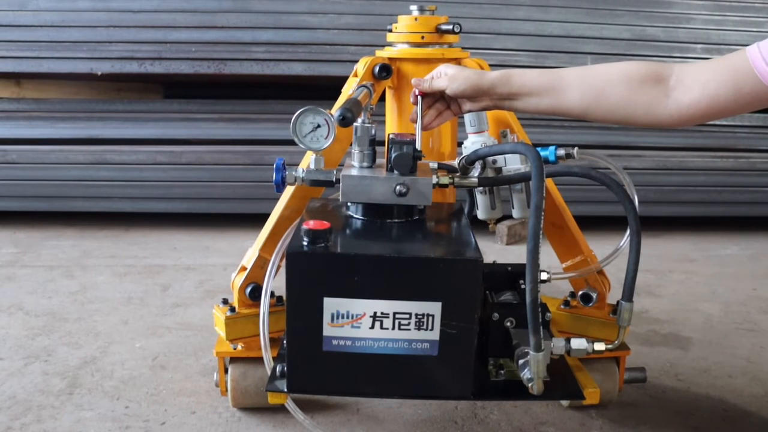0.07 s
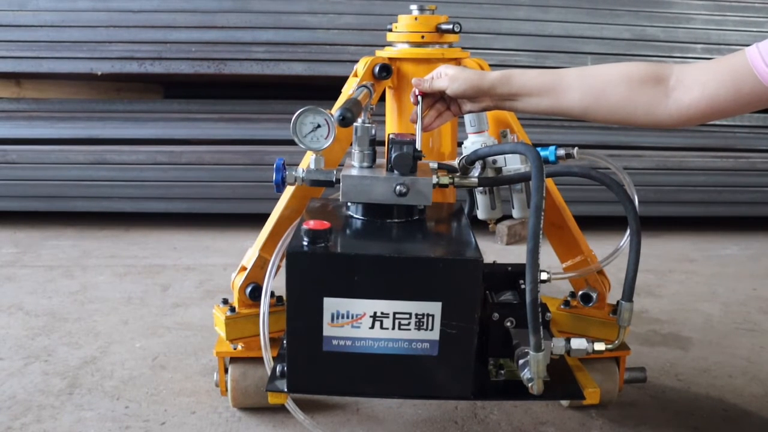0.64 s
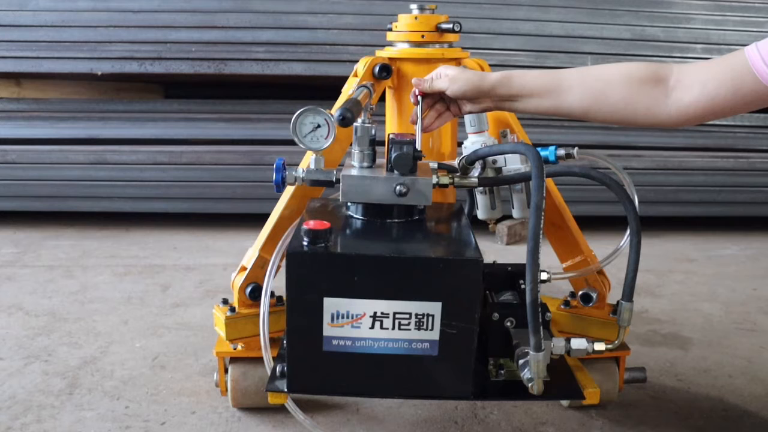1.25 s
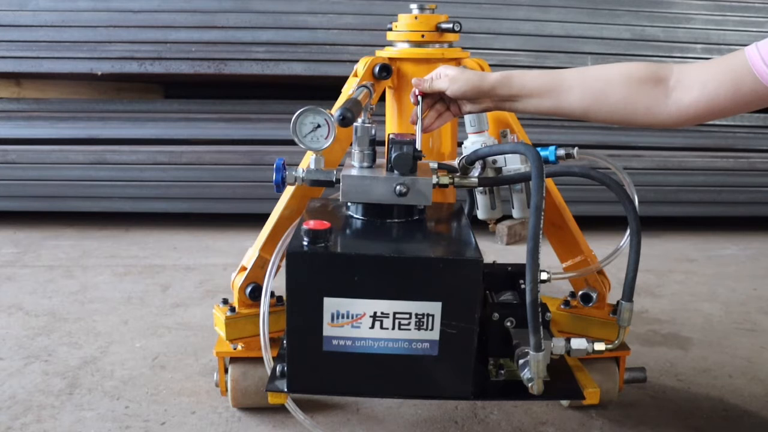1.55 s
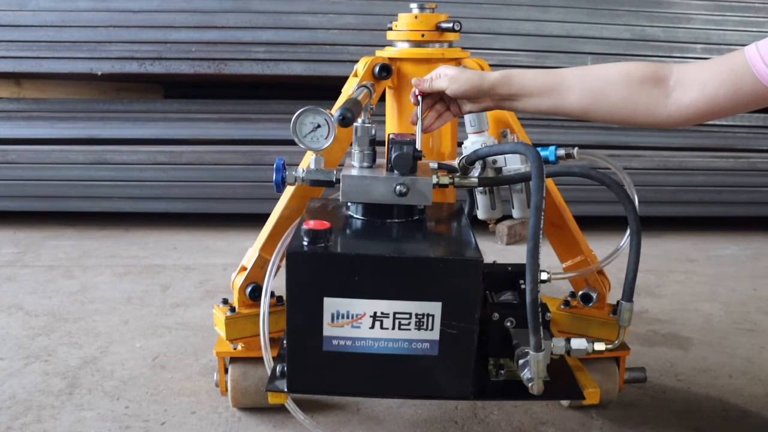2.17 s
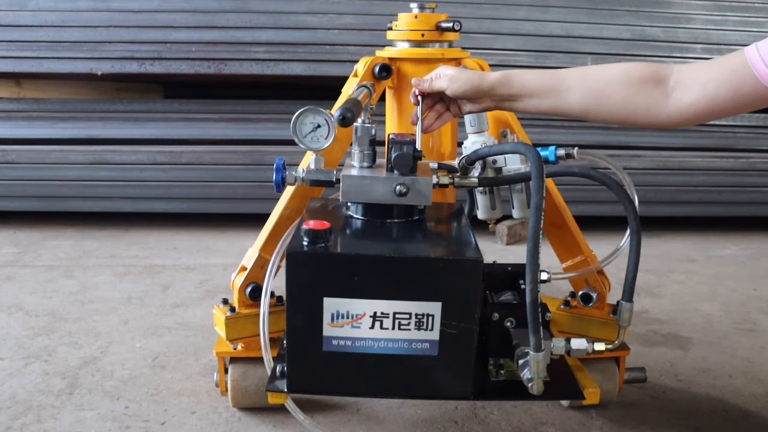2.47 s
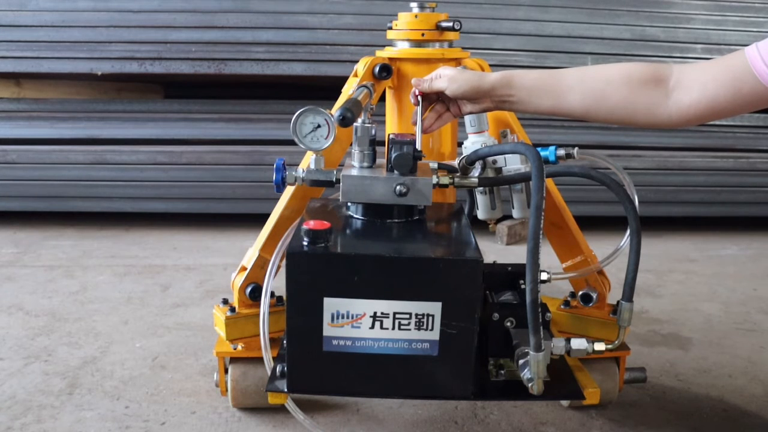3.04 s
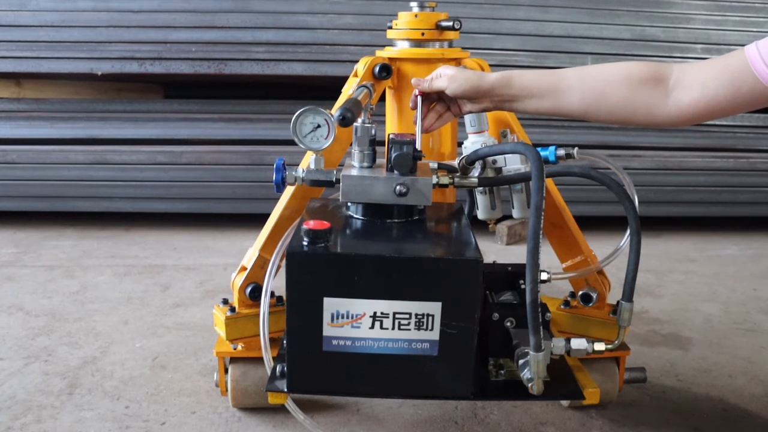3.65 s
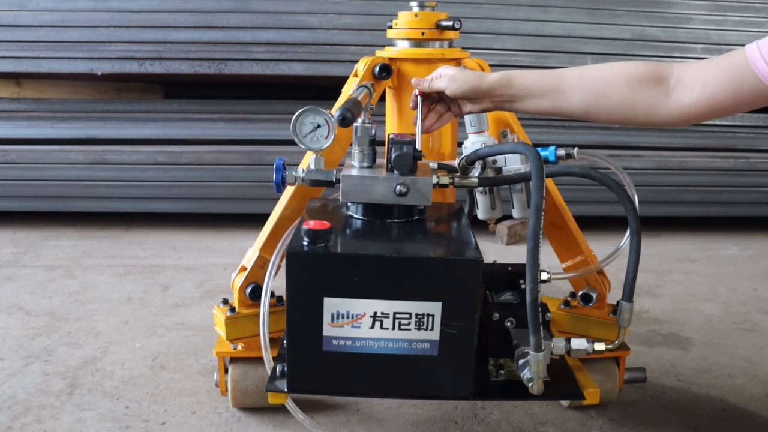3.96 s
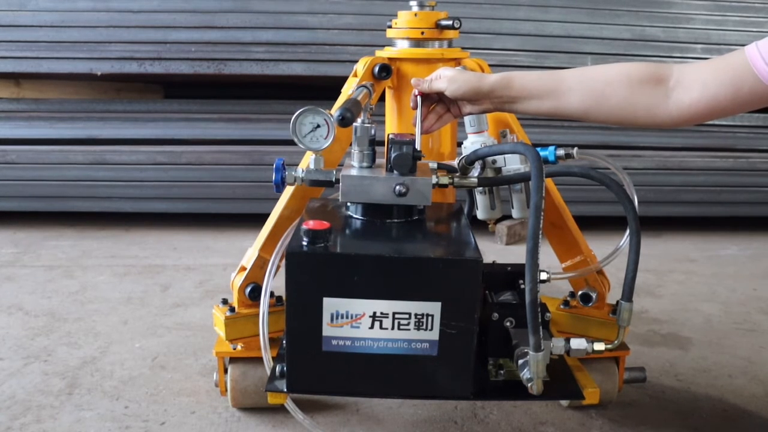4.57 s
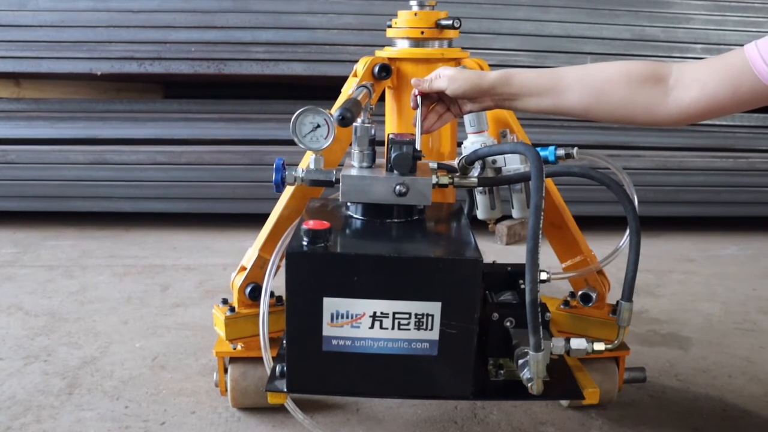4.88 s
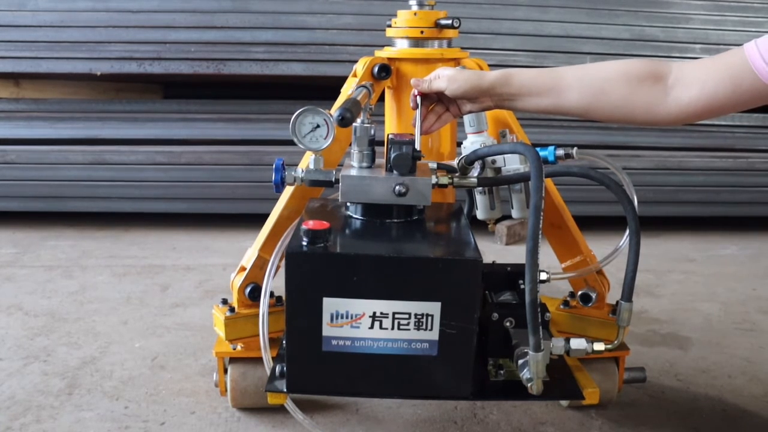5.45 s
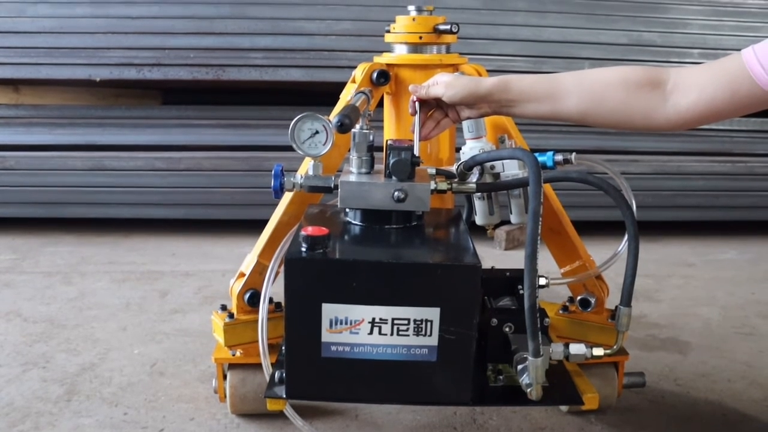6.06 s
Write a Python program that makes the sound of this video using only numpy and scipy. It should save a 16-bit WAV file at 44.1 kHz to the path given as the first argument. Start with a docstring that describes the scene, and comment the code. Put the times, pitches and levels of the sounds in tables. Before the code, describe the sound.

An air-driven hydraulic pump on a jack runs throughout at nearly eight strokes a second. Each stroke gives a bright spit of air, a metallic valve click and a knock on the oil tank, then a duller return knock. Exhaust air hisses continuously over a low rush. The pump is close by in a lightly echoing workshop, and its draught buffets the microphone in irregular gusts.

```python
"""Air-driven jack pump

An air-driven hydraulic pump runs on a jack in a workshop, nearly eight strokes a second. Each cycle
the air valve spits and clicks, and the piston knocks on the oil tank, then again, duller, on its return.
Spent air hisses through the muffler all the while over a low rush; its draught buffets the microphone."""
import sys
import numpy as np
from scipy import signal
from scipy.fft import rfft, irfft
from scipy.io import wavfile
from scipy.ndimage import uniform_filter1d

SR = 44100
rng = np.random.default_rng(int(sys.argv[2]) if len(sys.argv) > 2 else 0)


def generate_wav(sig):
    """Save sig (samples, or channels by samples) to the path in sys.argv[1] as 16-bit PCM at SR."""
    pcm = np.round(np.clip(np.atleast_2d(sig).T, -1, 1) * 32767).astype(np.int16)
    wavfile.write(sys.argv[1], SR, pcm)


N = 278271
TIME, HZ = np.arange(N) / SR, np.fft.rfftfreq(N, 1 / SR)

# pump strokes: t/s, knock accent/dB, spit accent/dB
STROKES = [(0.0082, -0.5, 0.5), (0.1366, 0, -0.5), (0.2656, -1.5, -3), (0.3942, -0.5, 0.5),
           (0.5234, -1, -2), (0.6522, 1, 1), (0.781, 0, -1), (0.9103, -2, 0.6), (1.0397, -1, 0),
           (1.1681, 0.5, 1), (1.2971, -1, -0.5), (1.426, -1, -1.5), (1.555, -1.2, -0.5), (1.6838, -3.5, -3),
           (1.8133, 0.5, -0.3), (1.9427, 0.5, -0.5), (2.0716, -0.5, -1.3), (2.201, 1, 0.7), (2.3303, 1, 0),
           (2.4589, 1, 0.5), (2.5873, -1.5, 1), (2.7164, -1.5, -0.5), (2.846, 1.5, -0.5),
           (2.975, -0.5, 0.5), (3.1037, -2.5, 0), (3.232, 0.5, 0.5), (3.3608, -0.7, 1.5), (3.4895, 1.5, 1),
           (3.6185, 2.5, 1), (3.748, 3, 0), (3.877, -2, -1), (4.0062, -5, -15), (4.1352, 0, 1),
           (4.2637, -0.5, 0.2), (4.3934, -5, -1), (4.5225, -0.8, 0.2), (4.6517, 0.5, 0), (4.782, 0.5, 1),
           (4.9103, -0.5, -1), (5.0394, 2, 0), (5.1686, 0.4, 0.5), (5.2974, -1.5, -0.5), (5.427, -0.6, 0),
           (5.5549, 3, 0.5), (5.6843, 0.5, 0.5), (5.8136, 1, -0.5), (5.9428, 2, 1), (6.0483, -1, -1.5),
           (6.1774, 0.6, 0.5), (6.3065, 0.5, 0)]
# likeness of the air noise at the two microphone ports: f/Hz, coherence/0-1
AIR_COHERENCE = [(150, .5), (1000, .8), (2100, .8), (2700, .4), (4400, .88), (5200, .55), (10000, .68),
                 (12000, .4)]
# air noise arrives mostly from the right: f/Hz, left phase lead/rad
AIR_PHASE = [(1200, -0.37), (3100, -0.02), (4300, 0.26), (6100, -0.6), (8700, -0.99), (9300, -1.1),
             (11700, -2)]
# balance of the air noise: f/Hz, left minus right/dB
AIR_PAN = [(150, -2), (1000, 0), (2100, -1), (3200, -3.5), (4400, 0), (6300, -3), (8300, -3), (10000, -4),
           (12000, -5.5)]
# colour of the air valve's spit: f/Hz, level/dB
SPIT_SPECTRUM = [(500, -18), (2200, -5), (2720, 2), (3300, -4), (4500, 9.5), (5100, -16), (7500, 5.5),
                 (8800, 1.5), (10200, 7), (12000, 5)]
# exhaust envelope through one cycle: t/s after the stroke, level/dB
EXHAUST_ENVELOPE = [(0, 3), (.003, 6), (.013, 5.5), (.05, 4), (.0572, 2), (.0592, -2.5), (.0617, -1),
                    (.0645, 2.5), (.095, 3), (.118, 5.5), (.129, 2)]
# colour of the hiss through the muffler: f/Hz, level/dB
MUFFLER_SPECTRUM = [(1000, -43), (1700, -4), (1980, -3.5), (2400, 0), (2720, -6), (3230, 1.5), (3650, 0),
                    (3880, -2.5), (4100, 0), (4450, 1.5), (4900, -4.5), (5400, -3), (5950, -3.5), (6400, 1),
                    (6900, -0.5), (7450, 3), (8000, 0), (8550, -3.5), (9200, -3.5), (9950, 2), (10900, -3),
                    (11400, -4.5), (11750, -7), (15500, -43), (22000, -120)]
# colour of the low rush of air and oil: f/Hz, level/dB
RUSH_SPECTRUM = [(30, -11), (58, -25), (95, -8), (160, 4), (290, 5), (400, -2.5), (490, -0.5), (700, 1),
                 (1100, 4), (1450, -0.5), (1600, -0.5), (2100, -11), (2700, -38)]
# piston blows in three groups, the knock, a springy mid-stroke tap and the duller return:
# t/s after the stroke, relative force (push +, pull -), contact corner f/Hz, contact damping
PISTON_BLOWS = [(-0.00182, 0.087, 919, 0.19), (-0.00041, 0.87, 2428, 1.4), (0.00116, 0.2, 1370, 0.25),
                (0.00183, -0.55, 1096, 1.8), (0.00427, 0.19, 722, 0.81), (0.03284, 0.023, 1272, 0.16),
                (0.0367, 0.11, 1270, 0.15), (0.0536, 0.052, 741, 0.25), (0.05767, 0.47, 706, 0.69),
                (0.0589, 0.65, 683, 0.71), (0.06144, -0.23, 784, 0.26), (0.06408, 0.24, 1830, 0.97),
                (0.0731, 0.03, 1084, 0.12)]
# ring of the pump body and oil tank: f/Hz, level/dB, t60/s
TANK_MODES = [(160.5, -22, 0.093), (210, -12.5, 0.016), (484, -21, 0.04), (602, -23, 0.06),
              (710, -14, 0.042), (902, -11.5, 0.021), (1005, -6.5, 0.035), (1061, -4.5, 0.025),
              (1125, -10, 0.045), (1419, -9, 0.053), (1697, -12, 0.024), (1906, -5.5, 0.014),
              (2053, -5, 0.03)]
# valve clicks in one cycle: t/s after the stroke, relative force
VALVE_CLICKS = [(-.0095, .25), (.003, 0.42), (.0075, .28), (0.0525, 0.089)]
# ring of the steel valve: f/Hz, level/dB, t60/s
VALVE_MODES = [(3180, 6, 0.035), (3320, 6, 0.026), (3800, -2, 0.011), (4100, -4, .03), (4280, 0, 0.035)]
# workshop reverb: f/Hz, t60/s
ROOM_DECAY = [(150, 0.94), (1000, 0.041), (4000, 1), (12000, 0.68)]
# narrow hollows in the pump's tone: f/Hz, width/Hz, gain/dB
NOTCHES = [(428, 45, 0), (1620, 84, -2.5), (2684, 72, -4.5), (5050, 210, -2), (8800, 320, -.8)]
# gusts of exhaust air at the microphone: t/s, level/dB, length/s, centre f/Hz, left minus right/dB
GUSTS = [(0.105, -27, 0.13, 503, -4), (0.248, -22.5, 0.024, 440, -7), (0.309, -21, 0.026, 588, -12),
         (0.411, -18.5, 0.042, 490, -15), (0.441, -18.1, 0.018, 427, -9), (0.571, -20.5, 0.017, 520, -6),
         (0.671, -18.5, 0.053, 440, -7), (0.967, -22, 0.017, 510, 8), (0.998, -25, 0.042, 390, 4),
         (1.07, -21, 0.013, 380, 7), (1.145, -23, 0.06, 365, 5), (1.341, -26.4, 0.057, 580, 6),
         (1.547, -22.5, 0.017, 445, -9), (1.782, -23.5, 0.013, 380, -10), (2.151, -20.5, 0.016, 346, -11),
         (2.219, -29, 0.031, 312, -10), (2.251, -16, 0.044, 266, -10.5), (2.32, -24, 0.15, 212, -3),
         (2.527, -23, 0.037, 510, -6), (2.855, -25.5, 0.059, 503, -10), (2.898, -16, 0.017, 435, -8),
         (3.107, -25, 0.023, 543, -7), (3.157, -26, 0.038, 533, -9), (3.282, -17, 0.044, 534, -9),
         (3.538, -22.5, 0.021, 450, -8), (3.573, -19, 0.0091, 355, 0), (3.607, -16, 0.011, 550, -8),
         (3.64, -15.5, 0.034, 380, -9), (3.682, -16.5, 0.034, 473, -8), (3.893, -17.5, 0.025, 611, -8),
         (3.939, -24, 0.037, 557, 0), (3.974, -16, 0.047, 560, -5), (4.322, -21, 0.0068, 730, -2),
         (4.345, -15, 0.015, 546, -6), (4.384, -23.5, 0.019, 623, -7), (4.928, -27, 0.014, 376, -6),
         (4.969, -23, 0.051, 334, -6), (5.01, -18, 0.037, 430, -16), (5.07, -21.5, 0.2, 230, -6),
         (5.108, -17.5, 0.026, 445, -16), (5.25, -19.5, 0.055, 604, -8), (5.836, -24.5, 0.12, 274, -11),
         (6.099, -20.5, 0.023, 566, -11), (6.215, -27, 0.11, 448, -5)]
# large single eddies: t/s, level/dB, centre f/Hz, left minus right/dB
SLAPS = [(0.6732, -8, 360, -9), (0.686, -6.5, 415, -13), (2.2528, -10, 263, -14), (3.277, -13, 500, -10),
         (3.6085, -7, 452, -14), (3.6442, -11, 287, -2), (3.6852, -13, 450, -11), (3.971, -7, 502, -10),
         (3.9858, -3, 513, -8), (4.3514, -7.5, 467, -8), (5.1134, -8, 425, -16)]


def gain_of(db):
    """Decibels to amplitude."""
    return 10 ** (np.asarray(db) / 20)


def unit_rms(x):
    """Scales to rms 1."""
    return x / np.sqrt(np.mean(x ** 2) + 1e-20)


def curve(points, hz):
    """Reads a table on a log-frequency axis."""
    f, value = np.transpose(points)
    return np.interp(np.log(hz + 1), np.log(f + 1), value)


def pan(side_db):
    """Left and right gains for a level difference."""
    return gain_of(np.array([[.5], [-.5]]) * side_db)


def air_noise(spectrum):
    """Coloured stereo noise, partly alike at the two microphone ports and leaning right."""
    left, other = rfft(rng.standard_normal((2, N)))
    coherence = curve(AIR_COHERENCE, HZ)
    right = coherence * left + np.sqrt(1 - coherence ** 2) * other
    right *= np.exp(-1j * curve(AIR_PHASE, HZ))
    stereo = np.array([left, right]) * pan(curve(AIR_PAN, HZ))
    return unit_rms(irfft(stereo * gain_of(curve(spectrum, HZ)), N))


def stroke_clock(early_s):
    """Seconds since the latest stroke began, `early_s` before its knock, and that stroke's index."""
    starts = np.transpose(STROKES)[0] - early_s
    latest = np.searchsorted(starts, TIME, side="right") - 1
    period = np.median(np.diff(starts))
    since = np.where(latest < 0, TIME - starts[0] + period, TIME - starts[latest])
    return since, np.maximum(latest, 0)


def spit(level_db=-7.0, early_s=.0094, attack_s=0.00072, decay_s=0.0038, accent=2.1):
    """A sharp, bright puff as the air valve opens just ahead of the knock."""
    since, stroke = stroke_clock(early_s)
    accent_db = accent * np.transpose(STROKES)[2][stroke]
    envelope = (1 - np.exp(-since / attack_s)) * np.exp(-since / decay_s)
    return gain_of(level_db + accent_db) * envelope * air_noise(SPIT_SPECTRUM)


def exhaust(level_db=-26.5, accent=0.54, flutter_db=0.65):
    """Turbulent hiss that swells after each knock and chokes as the piston turns round."""
    since, stroke = stroke_clock(0)
    flow_db = np.interp(since, *np.transpose(EXHAUST_ENVELOPE))
    accent_db = accent * np.transpose(STROKES)[1][stroke]
    flutter = unit_rms(uniform_filter1d(rng.standard_normal(N), size=130))
    return gain_of(level_db + flow_db + accent_db + flutter_db * flutter) * air_noise(MUFFLER_SPECTRUM)


def rush(level_db=-32.5, lumpy_db=1.95, stir=0.075, settle_s=0.13):
    """A low, lumpy bed of air and oil, stirred up around gusts and calm between them."""
    lumps = unit_rms(uniform_filter1d(uniform_filter1d(rng.standard_normal(N), size=700), size=300))
    wind = sum(gain_of(db) ** 2 * length * np.exp(-abs(TIME - at) / settle_s)
               for at, db, length, _, _ in GUSTS)
    wind_db = 10 * np.log10(wind / np.median(wind))
    return gain_of(level_db + lumpy_db * lumps + stir * wind_db) * air_noise(RUSH_SPECTRUM)


def struck(blows, modes, scatter_db, accent, top_hz, jitter_s=.00003, accent_fade_s=0.11, size=288000):
    """Every stroke deals its blows to ringing modes; soft contacts leave the high ones quiet."""
    starts, knock_db = np.transpose(STROKES)[:2]
    hz, t = np.fft.rfftfreq(size, 1 / SR), np.arange(SR // 4) / SR
    ring = sum(gain_of(db - 60 * t / t60) * np.cos(2 * np.pi * f * t) for f, db, t60 in modes)
    drive = 0
    for delay, force, corner_hz, damping in blows:
        # loose parts never land quite alike
        lands = starts + delay + jitter_s * rng.standard_normal(len(starts))
        hit_db = scatter_db * rng.standard_normal(len(starts))
        hit_db += accent * knock_db * np.exp(-delay / accent_fade_s)
        hits = np.zeros(size)
        hits[np.round(lands * SR).astype(int)] = force * gain_of(hit_db)
        s = 1j * hz / corner_hz
        drive += rfft(hits) / (1 + damping * s + s ** 2)  # the contact is a springy low-pass
    drive /= 1 + (hz / top_hz) ** 20
    return signal.oaconvolve(irfft(drive, size)[:N], ring)[:N]


def piston(level_db=-12.0, side_db=0.4):
    """The piston knocks on the tank at both ends of its travel and bounces each time."""
    knocks = struck(PISTON_BLOWS, TANK_MODES, scatter_db=0.85, accent=0.99, top_hz=2350)
    return gain_of(level_db) * pan(side_db) * knocks


def valve(level_db=-20.0, side_db=-5, contact_hz=5000, damping=2):
    """The steel valve snaps over and rings briefly."""
    blows = [(delay, force, contact_hz, damping) for delay, force in VALVE_CLICKS]
    clicks = struck(blows, VALVE_MODES, scatter_db=0, accent=1.7, top_hz=9000)
    return gain_of(level_db) * pan(side_db) * clicks


def workshop(send, predelay_s=0.014, echoes_per_s=3000):
    """Scattered reflections off floor and stacked steel, each band dying at its own speed."""
    echoes = rng.standard_normal((2, SR)) * (rng.random((2, SR)) < echoes_per_s / SR)
    echoes *= TIME[:SR] > predelay_s
    hz, t, bands = signal.stft(echoes, SR, nperseg=256)
    decay = gain_of(-60 * t / curve(ROOM_DECAY, hz)[:, None])
    tail = signal.istft(bands * decay, SR, nperseg=256)[1]
    tail /= np.linalg.norm(tail, axis=1, keepdims=True)
    return signal.oaconvolve(send, tail, axes=1)[:, :N]


def carve_notches(x):
    """Narrow notches hollow out the pump's sound, leaving the draught untouched."""
    dip_db = sum(db * np.exp(-((HZ - hz) / width) ** 2) for hz, width, db in NOTCHES)
    return irfft(rfft(x) * gain_of(dip_db), N)


def draught(eddies_per_s=600, spread_db=3.5, stereo_width=0.8, left_lag_s=0.00036,
            damping=0.99, rolloff_ratio=0.38, size=2 ** 14):
    """Each gust is a swarm of eddies hitting the ports; faster gusts have smaller, higher ones."""
    t, hz = (np.arange(size) - size // 2) / SR, np.fft.rfftfreq(size, 1 / SR)
    lag = np.exp(-2j * np.pi * hz * np.array([[left_lag_s], [0]]))
    out = np.zeros((2, N + size))
    for at, db, length, centre_hz, side_db in GUSTS:
        polarity = rng.choice([-1, 1], (3, size))  # rows: shared, left only, right only
        strength = gain_of(spread_db * np.minimum(rng.exponential(1, (3, size)), 4))
        eddies = polarity * strength * (rng.random((3, size)) < eddies_per_s / SR)
        swell = np.exp(-2 * abs(t) / length)
        swarm = (eddies[0] + stereo_width * eddies[1:]) * swell
        s = 1j * hz / centre_hz
        colour = s / (1 + damping * s + s ** 2) / (1 + s / rolloff_ratio)  # darkened band-pass
        gust = unit_rms(irfft(rfft(swarm) * colour * lag, size) * pan(side_db))
        start = round(at * SR)
        out[:, start:start + size] += gain_of(db) * gust * np.sqrt(np.mean(swell ** 2))
    return out[:, size // 2:][:, :N]


def slaps(left_lag_s=0.00037):
    """Single large eddies: one swing of pressure that reaches the right port first."""
    out = np.zeros((2, N))
    for at, db, centre_hz, side_db in SLAPS:
        phase = 2 * np.pi * centre_hz * (TIME - at - np.array([[left_lag_s], [0]]))
        swing = -phase * np.exp(-np.minimum(phase ** 2, 100) / 2)
        out += gain_of(db) * pan(side_db) * swing
    return out


def scene(knock_send_db=-11, air_send_db=-14):
    """The pump in its workshop, with the draught dry and right on the microphone."""
    knocks = piston() + valve()
    air = exhaust() + spit()
    room = workshop(gain_of(knock_send_db) * knocks + gain_of(air_send_db) * air)
    return carve_notches(knocks + air + room + rush()) + draught() + slaps()


def record(dry, low_cut_hz=105, ceiling=.85, high_cut_hz=12050):
    """Bass roll-off, soft overload and a steep high cut."""
    thinned = signal.sosfilt(signal.butter(2, low_cut_hz, "highpass", fs=SR, output="sos"), dry)
    saturated = thinned / (1 + (thinned / ceiling) ** 4) ** .25
    high_cut = signal.firwin(511, high_cut_hz, window=("kaiser", 9), fs=SR)
    return signal.oaconvolve(saturated, high_cut[None], "same")


dry = scene()
out = record(dry)
generate_wav(out)
```